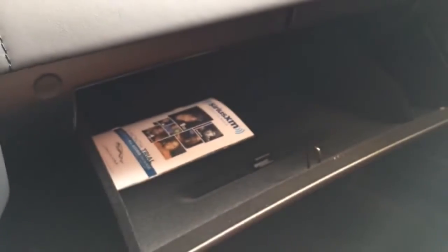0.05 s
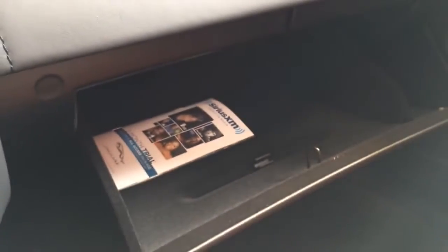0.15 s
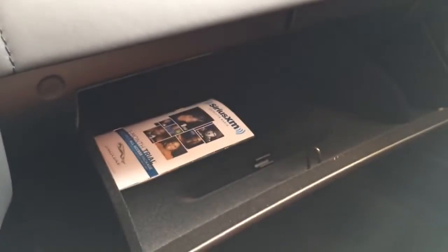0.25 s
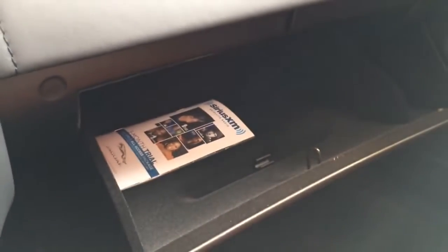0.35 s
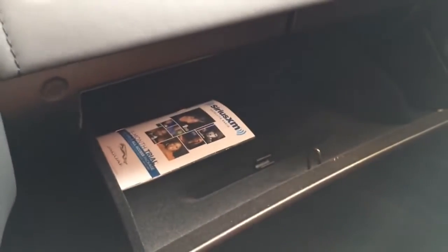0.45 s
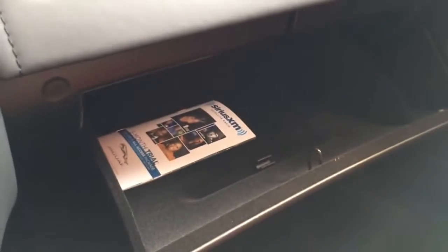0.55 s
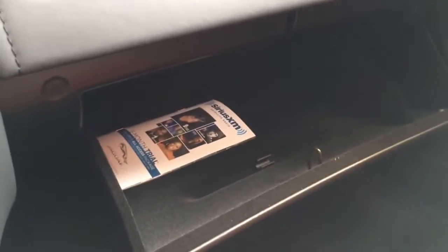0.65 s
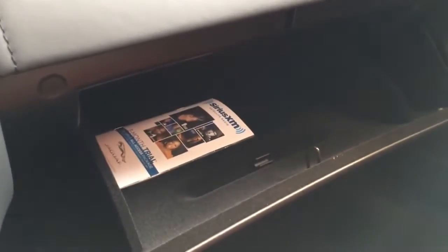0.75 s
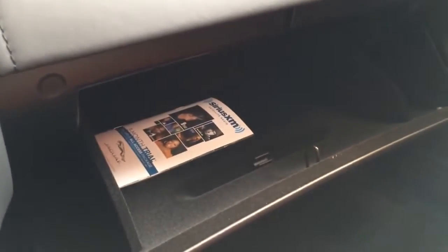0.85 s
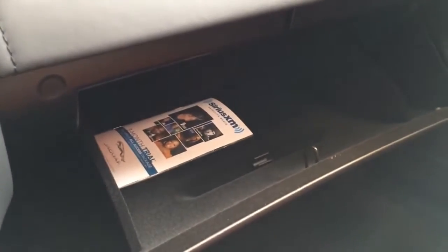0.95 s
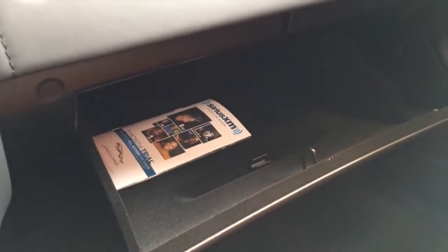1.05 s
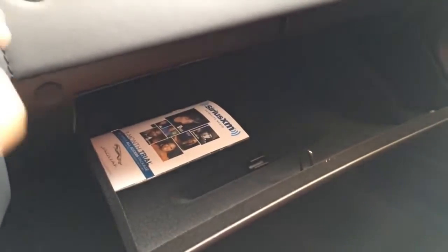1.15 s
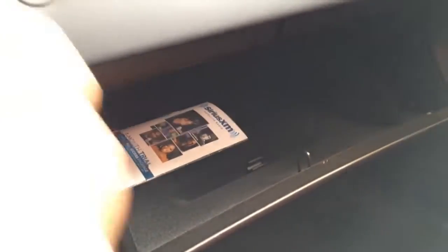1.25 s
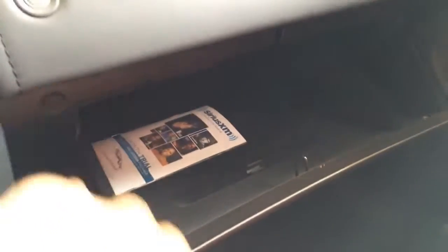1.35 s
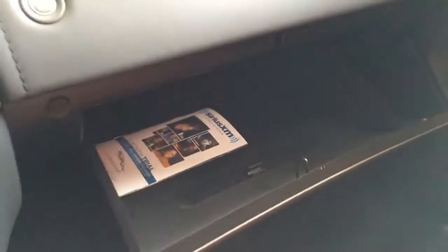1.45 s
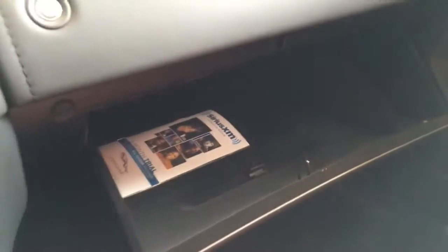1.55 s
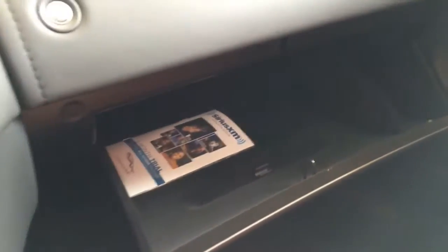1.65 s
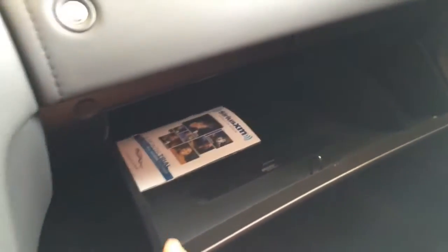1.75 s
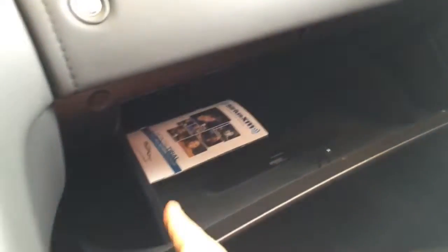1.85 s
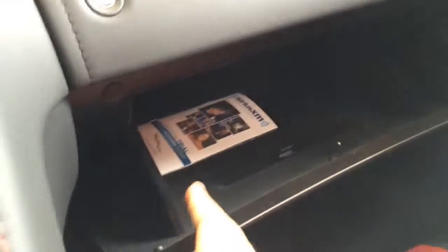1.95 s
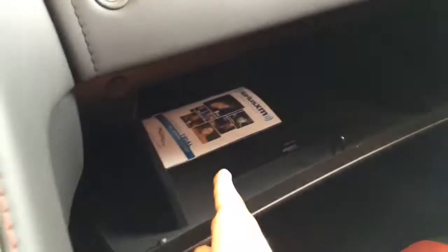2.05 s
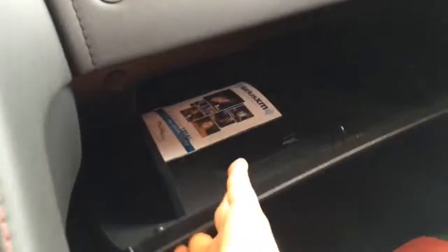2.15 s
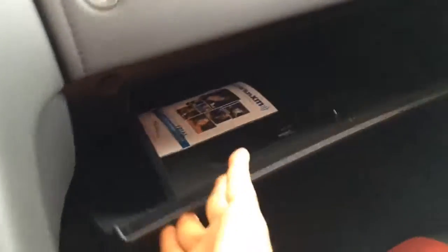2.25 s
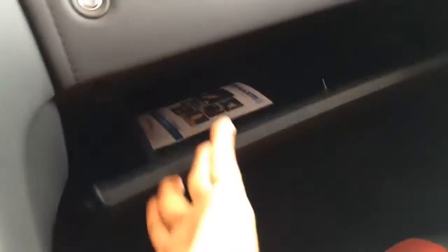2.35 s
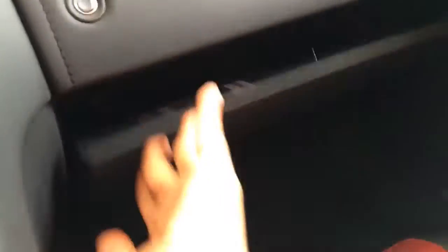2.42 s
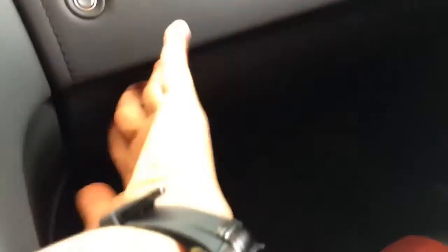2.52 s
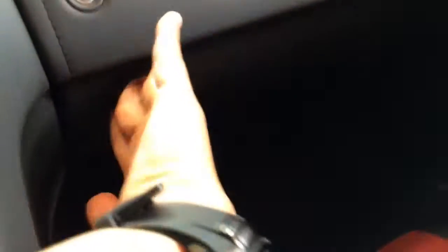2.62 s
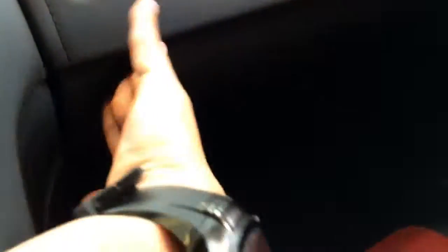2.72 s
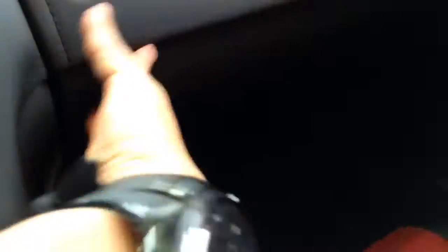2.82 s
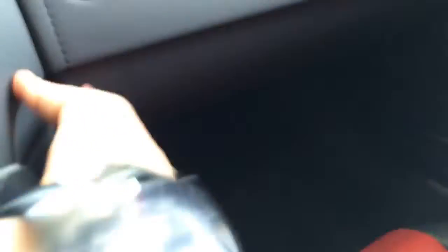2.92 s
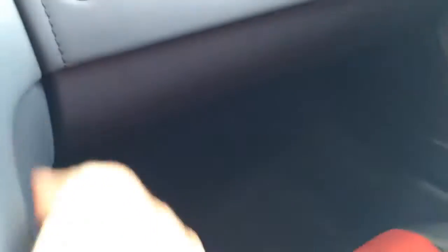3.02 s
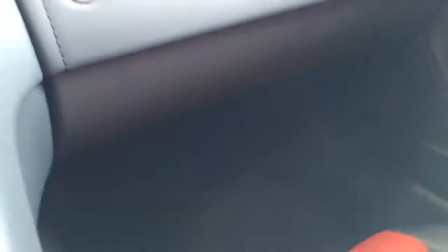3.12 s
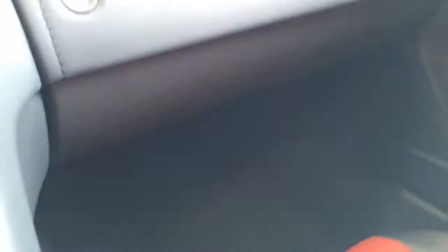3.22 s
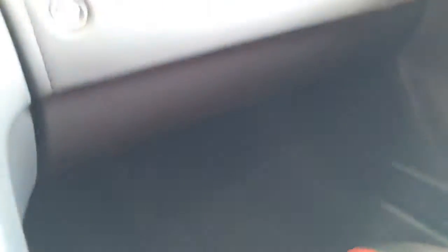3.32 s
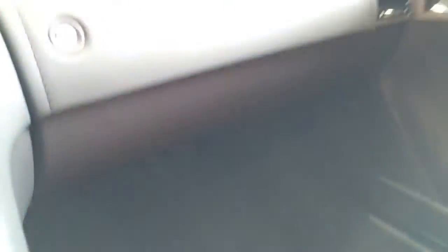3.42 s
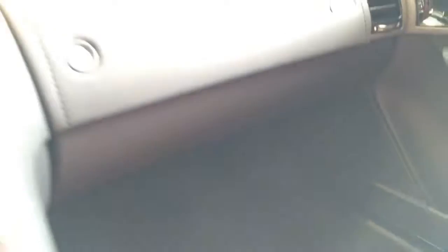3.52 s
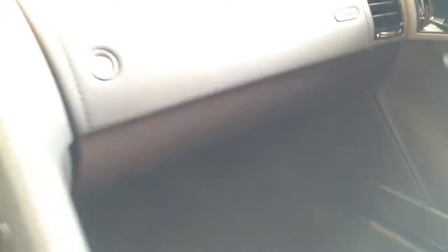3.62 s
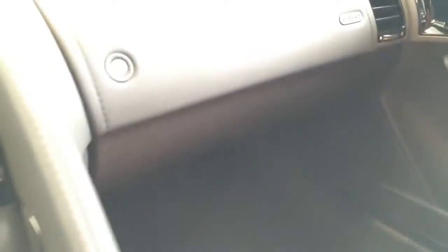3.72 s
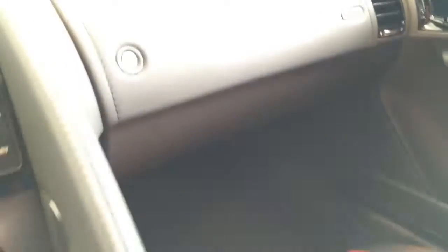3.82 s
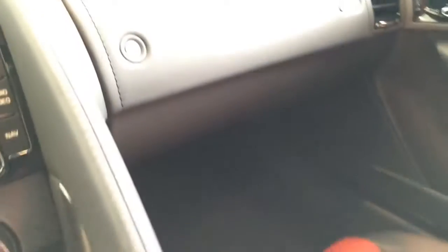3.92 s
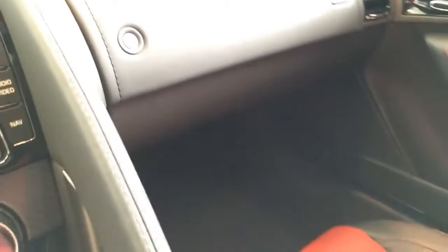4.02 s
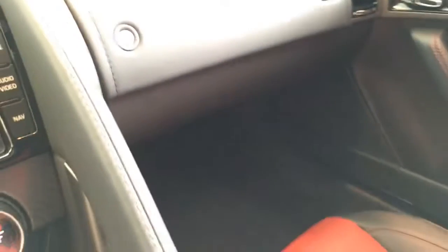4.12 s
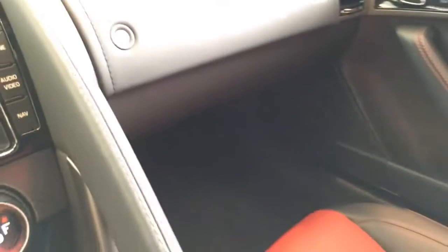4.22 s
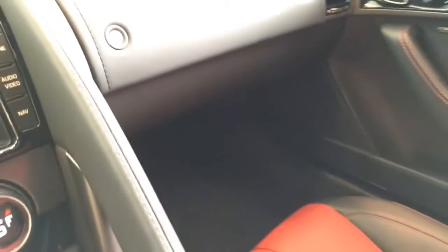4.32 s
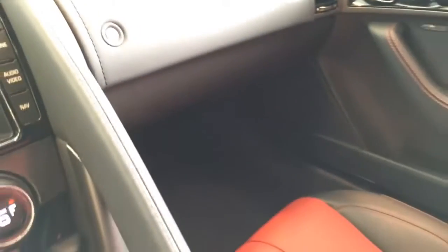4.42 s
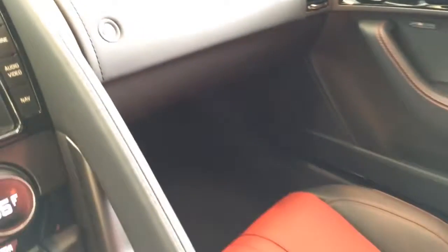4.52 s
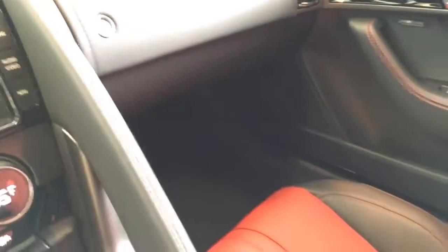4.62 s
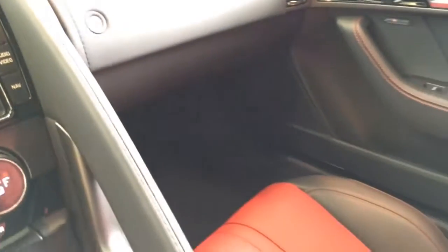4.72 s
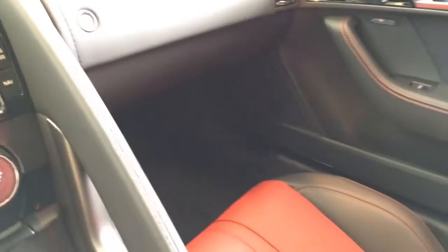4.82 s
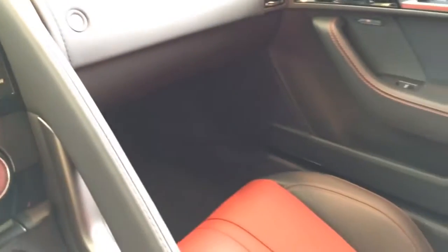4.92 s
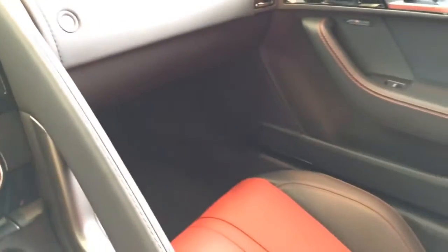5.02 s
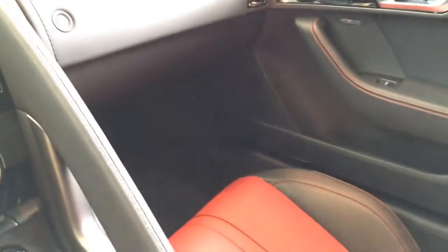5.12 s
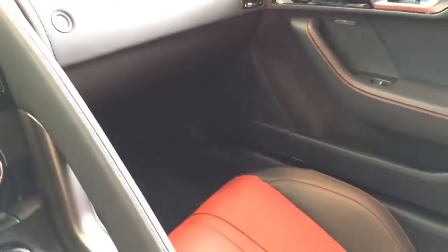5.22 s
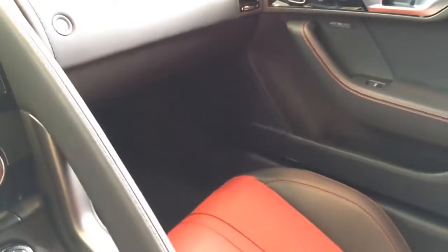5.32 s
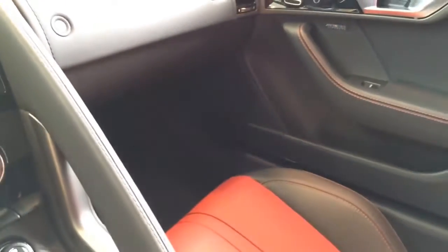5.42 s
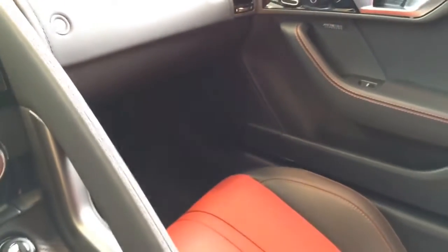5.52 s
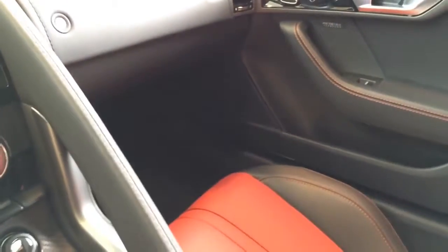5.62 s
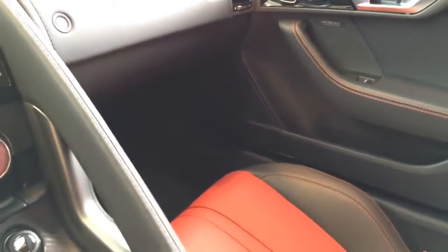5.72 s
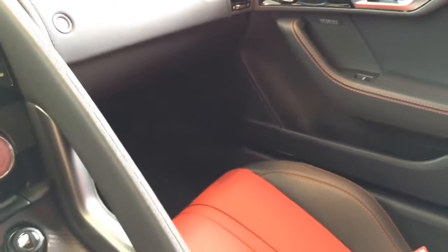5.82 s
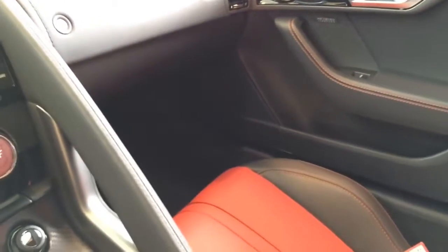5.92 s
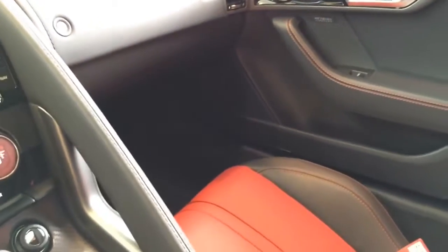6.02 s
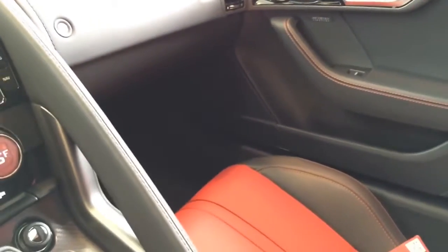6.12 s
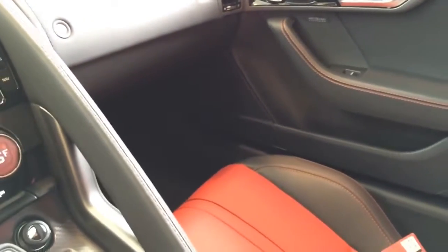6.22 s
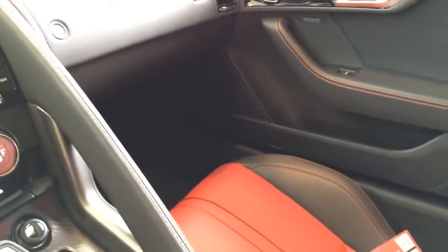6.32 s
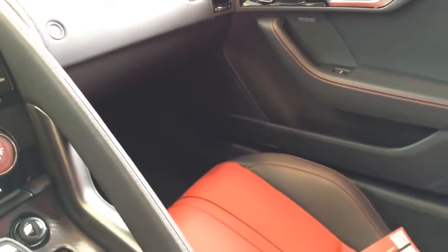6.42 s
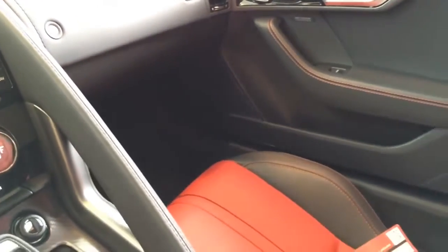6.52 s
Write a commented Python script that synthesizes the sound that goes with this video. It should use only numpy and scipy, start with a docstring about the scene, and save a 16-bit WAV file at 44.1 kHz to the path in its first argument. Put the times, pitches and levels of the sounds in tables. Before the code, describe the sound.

Inside a parked car with a faint low hum, a sleeve brushes the trim and a hand softly bumps the open plastic glove box lid. The lid swings on its rubbing hinge and shuts with a loud latch snap, a deep thud and a brief rattle. The sleeve draws back quietly, followed by a few small clicks and soft bumps. Everything is within arm's reach of the microphone.

```python
"""A parked car's cabin hums quietly, and a faint whistle comes and goes. A sleeve brushes the trim, skin and
leather squeak, and a hand bumps the open glove box lid, then swings it shut on its rubbing hinge.
The latch snaps over its catch, the lid thuds against its stops, the cabin booms and the contents rattle.
Afterwards the sleeve draws back, and a few small clicks and soft bumps sound over the hum."""
import sys
import numpy as np
from scipy import signal
from scipy.fft import rfft, irfft, next_fast_len
from scipy.io import wavfile
from scipy.ndimage import map_coordinates

SR = 44100
rng = np.random.default_rng(int(sys.argv[2]) if len(sys.argv) > 2 else 0)


def log_audio(samples):
    """Write samples as a 16-bit WAV file to the path given in sys.argv[1]."""
    # one column per channel
    frames = np.atleast_2d(samples).T
    # limit to full scale, then quantise
    limited = np.clip(frames, -1, 1)
    pcm = np.round(limited * 32767).astype(np.int16)
    wavfile.write(sys.argv[1], SR, pcm)


N = 289398

# In all tables, levels are relative and fade_s is the time to die away by 60 dB.
# the tones the plastic lid rings with: pitch_hz, level_db, fade_s
LID_TONES = [(289, -13, .22), (348, -14, .2), (389, -9, .17), (446, -10, .16), (560, -13, .18),
             (757, -2.5, .14), (826, -14, .14), (947, -4, .12), (1035, -8.5, .13), (1114, -8, .13),
             (1163, -9.5, .12), (1289, -14, .13), (1597, -5, .08), (1637, -6, .09), (1750, -16, .1),
             (1832, -11, .11), (1902, -7, .11), (2078, -7, .09), (2132, -14, .1), (2439, -14, .09),
             (2689, -15, .1), (3010, -16, .08), (3269, -12, .08), (3397, -15, .08), (3650, -17, .08),
             (5070, -14, .06), (5520, -15, .05), (7840, -16, .05), (8590, -14, .055)]
# the lid's crowded, overlapping tones, as bands of noise: pitch_hz, level_db, fade_s
LID_CLATTER = [(198, -16, 0.29), (248, -27.5, 0.12), (390, -12.5, .1), (620, -24.5, 0.11),
               (800, -13.5, 0.096), (1310, -17.5, .09), (1850, -11.5, 0.068), (2530, -19, 0.12),
               (3300, -18, 0.12), (5500, -15.5, 0.07), (8590, -17, 0.074), (10750, -25, .055),
               (15230, -23.5, .06)]


def amp(db):
    """Turn decibels into a number to multiply by."""
    return 10 ** (np.asarray(db) / 20)


def unit(x):
    """Scale a sound to an average (rms) level of 1."""
    return x / np.sqrt(np.mean(x ** 2) + 1e-20)


def along(points, hz):
    """Read between (pitch_hz, value) points on a log pitch scale."""
    pitches, values = np.transpose(points)
    return np.interp(np.log(hz + 1), np.log(pitches + 1), values)


def wobble(rate):
    """A smooth curve through `rate` random points a second."""
    points = rng.standard_normal(int(N * rate / SR) + 4)
    return map_coordinates(points, [np.arange(N) * rate / SR])


def filtered(x, response):
    """Turn each frequency of x up or down by response(hz)."""
    size = next_fast_len(x.shape[-1] + 8192)
    hz = np.fft.rfftfreq(size, 1 / SR)
    return irfft(rfft(x, size) * response(hz), size)[..., :x.shape[-1]]


def add(track, start_s, sound):
    """Mix a sound into the track at start_s."""
    part = track[round(start_s * SR):][:len(sound)]
    part += sound[:len(part)]


def gesture(start_s, rise_s, hold_s, fall_s):
    """A curve that rises from 0 to 1, holds, and falls back."""
    t = np.arange(N) / SR - start_s
    return np.clip(np.minimum(t / rise_s, (rise_s + hold_s + fall_s - t) / fall_s), 0, 1)


def ring(tones, scatter_db, detune=0, swell_cycles=0):
    """A struck part rings with fading tones, a bit different each time; big panels take time to swell."""
    t = np.arange(SR * 3 // 4) / SR
    hz, db, fade_s = np.transpose(tones)[:, :, None]
    strength, drift = rng.standard_normal((2, len(tones), 1))
    swell = 1 - np.exp(-hz * t / (swell_cycles + 1e-9))
    fade = np.exp(-np.log(1000) * t / fade_s)
    waves = np.sin(2 * np.pi * hz * (1 + detune * drift) * t)
    return np.sum(amp(db + scatter_db * strength) * swell * fade * waves, axis=0)


def burst(bands):
    """Crowded tones blur into noise: each band swells within a cycle and fades at its own speed."""
    t = np.arange(SR * 3 // 4) / SR
    hz, db, fade_s = np.transpose(bands)[:, :, None]
    edges = np.log(np.r_[hz[0] / 2, hz[:, 0], hz[-1] * 2])
    split = lambda f: np.array([np.interp(np.log(f + 1), edges, row) for row in np.eye(len(edges))[1:-1]])
    noise = filtered(rng.standard_normal(len(t)), split)  # one row per band
    noise /= noise.std(axis=1, keepdims=True)
    swell = 1 - np.exp(-2 * hz * t)
    fade = np.exp(-np.log(1000) * t / fade_s)
    return np.sum(amp(db) * swell * fade * noise, axis=0)


def dulled(x, cutoff_hz):
    """A softer hit loses the treble above cutoff_hz."""
    return signal.lfilter(*signal.butter(3, min(cutoff_hz, SR * .45), fs=SR), x)


def friction(colour, grain_db, uneven_db):
    """Rubbing is countless tiny slips, clumped by the surface's grain and by uneven pressure."""
    slips = rng.standard_normal(N) * amp(grain_db * wobble(900) + uneven_db * wobble(35))
    return unit(filtered(slips, lambda hz: amp(along(colour, hz))))


def cabin(level_db=-55.0, hiss_db=3.5, sway_db=1.4, split_hz=900):
    """Outside rumble seeps in and builds up at the pitches the cabin air favours, under a soft hiss."""
    # the background's tone colour: pitch_hz, level_db
    colour = [(12, -31), (20, -6.5), (49, -0.5), (85, -5), (109, -3), (144, -5), (180, -5), (252, -7.5),
              (315, -16.5), (565, -20.5), (686, -19.5), (1410, -27.5), (1820, -30), (8170, -39),
              (15500, -46.5)]
    # where the cabin air resonates: pitch_hz, width_hz, boost_db
    peaks = [(55.7, 13.5, 5.5), (186, 13, 5.5), (250.6, 15.6, 4.5), (359, 18, 4.5), (478, 114, 6),
             (560, 15, -1), (7850, 1400, 2)]
    boost_db = lambda hz: sum(db / (1 + (2 * (hz - centre) / width) ** 2) for centre, width, db in peaks)
    air = unit(filtered(rng.standard_normal(N), lambda hz: amp(along(colour, hz) + boost_db(hz))))
    rumble = filtered(air, lambda hz: 1 / (1 + (hz / split_hz) ** 4))
    hiss = air - rumble
    return amp(level_db) * (amp(hiss_db) * hiss + rumble * amp(sway_db * wobble(3.75)))


def hum(flutter_db=2.2, wander_rad=0.99):
    """A faint machine hum hangs in the cabin as a few unsteady tones."""
    # the hum's tones: pitch_hz, level_db
    tones = [(54, -70.5), (183, -73), (250, -73.5), (560, -76)]
    t = np.arange(N) / SR
    out = np.zeros(N)
    for hz, db in tones:
        flutter = amp(flutter_db * wobble(14))
        tone = np.sin(2 * np.pi * hz * t + wander_rad * wobble(12))
        out += amp(db) * unit(flutter * tone)
    return out


def whistle(pitch_hz=1410, level_db=-73, flutter_db=5, wander_rad=0.74):
    """A thin, wavering whistle comes and goes, barely heard."""
    tone = np.sin(2 * np.pi * pitch_hz * np.arange(N) / SR + wander_rad * wobble(31))
    swell = gesture(start_s=0.13, rise_s=.04, hold_s=0.14, fall_s=.5)
    return amp(level_db + flutter_db * wobble(30)) * swell * tone


def sleeve(swish_power=1.86, drag_power=0.97):
    """The sleeve rubs the trim; with speed, its bright swish grows faster than its dull drag."""
    # strokes of the arm: start_s, speed_up_s, steady_s, slow_down_s, swish_db, drag_db
    strokes = [(.92, .35, 0.074, 0.046, -48.5, -57), (1.492, .008, 0.029, 0.066, -57.5, -67),
               (1.51, 0.11, 0.11, 0.16, -65.5, -61), (1.76, 0.15, 0.15, .07, -65.5, -65.5),
               (2.33, 0.18, 0.15, 0.063, -60.5, -60), (2.82, 0.092, .01, 0.064, -68, -60),
               (3.15, 0.0076, 0.22, 0.034, -59.5, -60), (3.39, 0.12, .27, 0.18, -66, -61.5),
               (3.87, .15, .25, .45, -86, -70)]
    # the swish's tone colour: pitch_hz, level_db
    swish_colour = [(500, -22), (1100, -4), (1800, -5.5), (3500, -3.5), (6000, 1), (9000, 3), (12000, 1),
                    (15500, -0.5)]
    # the drag's tone colour: pitch_hz, level_db
    drag_colour = [(300, -8), (750, -4.5), (1150, -3.5), (1600, -0.5), (2000, 1), (2400, -3), (2900, -3.5),
                   (3800, -4.5), (7000, -12), (15000, -19)]
    swish = sum(amp(db) * gesture(*timing) ** swish_power for *timing, db, _ in strokes)
    drag = sum(amp(db) * gesture(*timing) ** drag_power for *timing, _, db in strokes)
    swish *= friction(swish_colour, grain_db=1.0, uneven_db=0.2)
    drag *= friction(drag_colour, grain_db=1.0, uneven_db=1.5)
    return swish + drag


def squeaks(roughness=0.067):
    """Skin and leather stick and slip, making a rough, sliding pitch."""
    # faint squeaks: start_s, length_s, first_hz, last_hz, level_db
    slides = [(1.188, 0.084, 1900, 1664, -54), (1.581, 0.19, 2830, 2710, -60.5),
              (1.64, 0.23, 1520, 1510, -60), (3.199, 0.12, 1600, 1604, -60), (3.2, 0.133, 2810, 2990, -58),
              (5.334, 0.017, 2320, 1420, -52.5)]
    out = np.zeros(N)
    for start_s, length_s, first_hz, last_hz, db in slides:
        n = int(length_s * SR)
        hz = np.geomspace(first_hz, last_hz, n) * (1 + roughness * wobble(476)[:n])
        tone = np.sin(2 * np.pi * np.cumsum(hz) / SR)
        add(out, start_s, amp(db) * np.hanning(n) * tone)
    return out


def hinge(speed_power=1.74):
    """The lid rubs on its hinge, louder as it gathers speed."""
    # a nudge, the swing, the last shove: start_s, speed_up_s, steady_s, slow_down_s, level_db
    swings = [(1.58, .17, 0.084, .5, -54), (2.1, .25, 0.44, .12, -51.5), (2.425, .05, 0.0085, .06, -47)]
    # the rubbing's tone colour: pitch_hz, level_db
    colour = [(30, -19), (90, 6.5), (170, 3.5), (280, -2), (550, -9), (820, -7.5), (1300, -16), (3000, -31),
              (8000, -56)]
    loudness = sum(amp(db) * gesture(*timing) ** speed_power for *timing, db in swings)
    return loudness * friction(colour, grain_db=3, uneven_db=0.5)


def nudges(per_second=25, push_hz=149, tap_db=-16.5, spread_db=5):
    """The hand shifts its grip: light touches at uneven times, as extra rows for bumps()."""
    # spells of fumbling: start_s, length_s, level_db
    fumbles = [(1.68, .15, -44.5), (2.1, .2, -42.5), (2.43, .09, -46), (5.14, .04, -43.5),
               (5.77, .09, -45.5)]
    rows = []
    for start_s, length_s, db in fumbles:
        count = max(1, round(length_s * per_second))
        for k, (early, strength) in enumerate(rng.uniform(-1, 1, (count, 2))):
            touch_s = start_s + length_s * (k + .5 - .5 * early) / count
            thump_db = db + spread_db * strength
            rows.append((touch_s, thump_db, push_hz, thump_db + tap_db))
    return rows


def bumps(press_delay_s=0.00726):
    """A fingertip taps the padded trim, then the flesh pushes; a slower push makes a deeper thump."""
    # touches of the hand: start_s, thump_db, push_hz, tap_db
    touches = [(1.702, -36.5, 128, -65), (1.7507, -31.5, 131, -39.5), (1.783, -47, 130, -49),
               (1.837, -30, 85.3, -68), (1.853, -31, 130, -50.5), (1.871, -32.5, 94, -60),
               (1.926, -34.5, 84.5, -62), (1.967, -37, 135, -66), (2.013, -42.5, 150, -52),
               (2.146, -48, 170, -51), (2.214, -30.5, 111, -43.5), (2.246, -39.5, 115, -45),
               (2.435, -42, 150, -50), (2.465, -49.5, 150, -44.5), (2.516, -36, 150, -55),
               (4.342, -36.5, 128, -54), (5.824, -39.5, 169, -54)]
    # the padded trim's low tones: pitch_hz, level_db, fade_s
    padding_tones = [(84, 2.5, 0.077), (114, 0, 0.13), (151.7, -5, 0.2), (185, -6.5, 0.056)]
    # the fingertip's noise bands: pitch_hz, level_db, fade_s
    tap_bands = [(224.6, -19, 0.035), (390, -2.5, 0.094), (570, -2.5, 0.028), (740, -14, 0.039),
                 (1090, -13, 0.066), (3000, -19, .04), (7900, -35, .04)]
    # the tapped panel's tones: pitch_hz, level_db, fade_s
    panel_tones = [(375, -11.5, 0.075), (565, -1.5, 0.07)]
    out = np.zeros(N)
    for start_s, thump_db, push_hz, tap_db in touches + nudges():
        push_filter = signal.butter(2, [push_hz / np.sqrt(2), push_hz * np.sqrt(2)], "band", fs=SR)
        thump = signal.lfilter(*push_filter, ring(padding_tones, scatter_db=1.0, detune=0.062))
        tap = burst(tap_bands) + ring(panel_tones, scatter_db=2.5, detune=0.0034)
        push_s = start_s + press_delay_s - .5 / push_hz  # soft flesh starts pressing half a cycle early
        add(out, push_s, amp(thump_db) * thump)
        add(out, start_s, amp(tap_db) * tap)
    return out


def latch(snap_s=2.5697, snap_db=-13.5, bright_hz=12700, gap_s=.0024, loss_db=4, dulling=0.54):
    """The latch grazes its catch, snaps over it and bounces, setting the lid ringing."""
    out = np.zeros(N)
    graze = dulled(burst(LID_CLATTER), bright_hz)
    add(out, snap_s - .0055, amp(-39.5) * graze)
    for k in range(4):  # each bounce is weaker and duller
        hit = dulled(burst(LID_CLATTER), bright_hz * dulling ** k)
        add(out, snap_s + k * gap_s, amp(snap_db - k * loss_db) * hit)
    ringing = ring(LID_TONES, scatter_db=.7, swell_cycles=3)
    add(out, snap_s + .0025, amp(-15.5) * ringing)  # the lid rings as the latch settles
    return out


def thud(boom_db=-2, pull_db=1.0, leak_hz=38):
    """The lid stops dead and pulls on the cabin air, which booms on; slow pressure leaks away."""
    # the lid landing on its stops: start_s, level_db
    landings = [(2.5745, -22.5), (2.5929, -0.5), (2.73, -27.5), (2.796, -31.5)]
    # low tones of the box and the cabin air: pitch_hz, level_db, fade_s
    box_tones = [(63, -25, .42), (67, -28.5, .45), (79, -14.5, .2), (97.4, -11.5, .19), (125, -21.5, .36),
                 (160, -27, .45), (173, -7.5, .042), (209.5, -17, .2), (295, -20, .085), (345, -26, .08)]
    # noise bands of the cabin's boom: pitch_hz, level_db, fade_s
    boom_bands = [(60, -39, 0.28), (120, -29, 0.4), (201, -41, 0.75), (255, -52, .4), (350, -40.5, 0.47),
                  (620, -59, .3), (850, -58, 0.45), (2500, -72, 0.295)]
    out = np.zeros(N)
    for start_s, db in landings:
        pull = -ring(box_tones, scatter_db=.3)  # minus: the pressure drops first
        add(out, start_s, amp(db) * (amp(boom_db) * burst(boom_bands) + amp(pull_db) * pull))
    return signal.lfilter(*signal.butter(2, leak_hz, "high", fs=SR), out)


def lid_rattle(ring_db=-13.5):
    """The stops and the rattling contents strike the lid through padding, which dulls each knock."""
    # the lid knocks shut, then rattles: start_s, level_db, brightness_hz
    knocks = [(2.5818, -12.5, 950), (2.5921, -15, 1290), (2.5996, -18.5, 1400), (2.616, -24, 1690),
              (2.6662, -32.5, 2800), (2.692, -30.5, 1410), (2.7324, -34.5, 2000), (2.778, -42, 1500)]
    out = np.zeros(N)
    for start_s, db, bright_hz in knocks:
        ringing = amp(ring_db) * ring(LID_TONES, scatter_db=.7, swell_cycles=3)
        add(out, start_s, amp(db) * dulled(ringing + burst(LID_CLATTER), bright_hz))
    return out


def clicks(ring_db=-2):
    """Small hard parts tick and set the trim ringing briefly."""
    # clicks of trim and latch parts: start_s, body_db, tick_db
    hits = [(2.591, -60, -45), (2.66, -52.5, -55), (2.987, -55, -57), (3.001, -57, -57), (4.351, -57, -78),
            (5.1356, -42.5, -69), (5.142, -47, -72), (5.218, -54, -62), (5.286, -52.5, -64),
            (5.2923, -49, -63), (5.339, -54.5, -78), (5.4093, -42.5, -40)]
    # the hard trim's tones: pitch_hz, level_db, fade_s
    trim_tones = [(1090, -9.5, 0.045), (1430, -8.5, 0.042), (1484, -1.5, 0.064), (1964, -6, 0.058),
                  (2296, -11, 0.035), (2916, -13, 0.067), (5000, -10, 0.035)]
    # noise bands of the click's body: pitch_hz, level_db, fade_s
    snap_bands = [(595, -13, 0.11), (1600, -8, 0.074), (3000, -13, 0.076), (4960, -16.5, 0.046),
                  (9000, -22.5, .05)]
    # noise bands of the high tick: pitch_hz, level_db, fade_s
    tick_bands = [(5170, -13, .02), (8850, -21, 0.014), (11500, -5, 0.0122), (14000, -15, 0.041)]
    # a small metal part's tones: pitch_hz, level_db, fade_s
    metal_tones = [(10470, -1.5, .012), (11800, -13.5, 0.064), (11840, -10, 0.024), (13900, -5.5, .012)]
    out = np.zeros(N)
    for start_s, body_db, tick_db in hits:
        ringing = amp(ring_db) * ring(trim_tones, scatter_db=4.5, detune=0.025, swell_cycles=1.0)
        body = ringing + burst(snap_bands)
        tick = burst(tick_bands) + ring(metal_tones, scatter_db=0.5, detune=0.0056)
        add(out, start_s, amp(body_db) * body + amp(tick_db) * tick)
    return out


def scene():
    """Everything is within arm's reach of one microphone."""
    shutting = latch() + lid_rattle() + thud() + clicks()
    rubbing = sleeve() + hinge() + squeaks()
    background = cabin() + hum() + whistle()
    return (shutting + rubbing + background + bumps())[None]


def record(dry, top_hz=15650):
    """The microphone clips at full level and cuts off the treble above top_hz."""
    return filtered(np.clip(dry, -1, 1), lambda hz: 1 / (1 + (hz / top_hz) ** 160))


dry = scene()
out = record(dry)
log_audio(out)
```